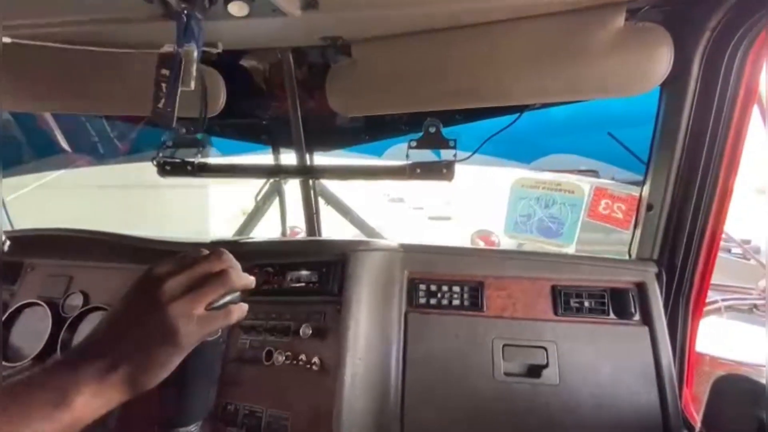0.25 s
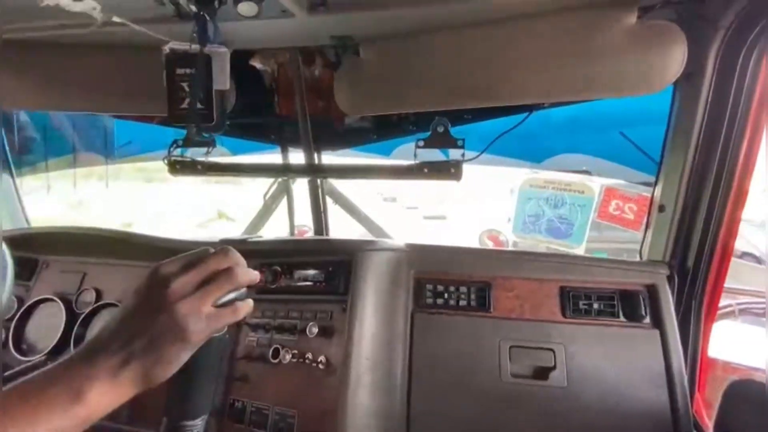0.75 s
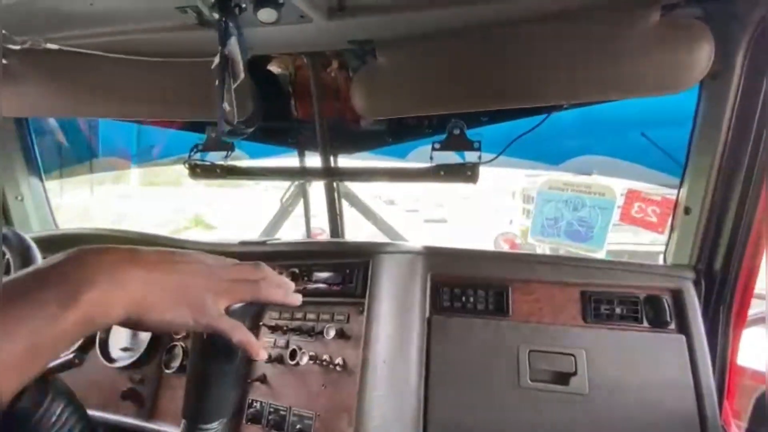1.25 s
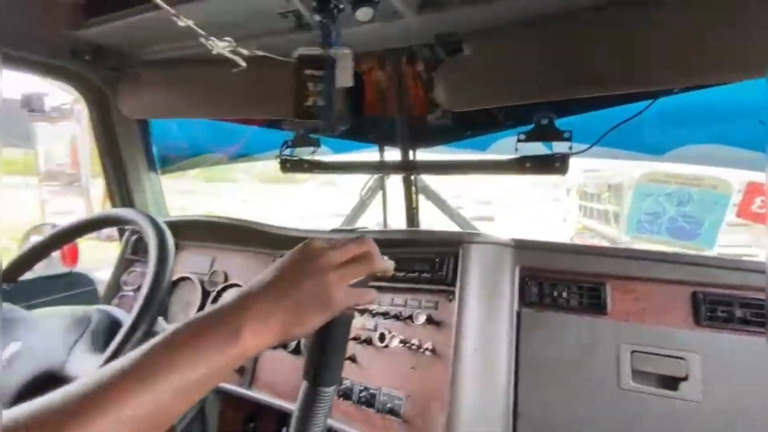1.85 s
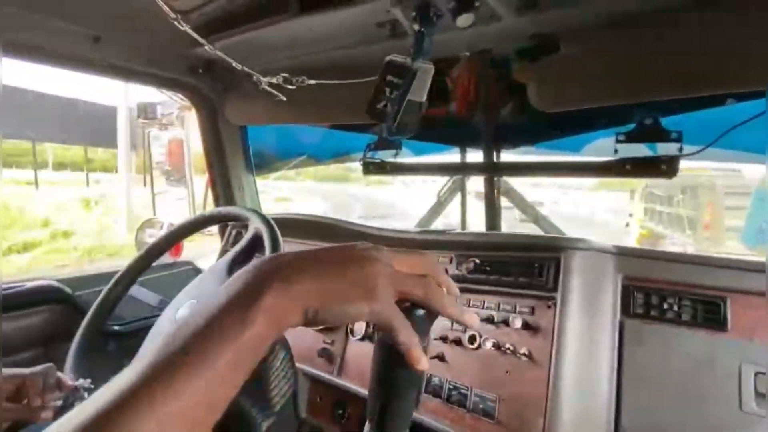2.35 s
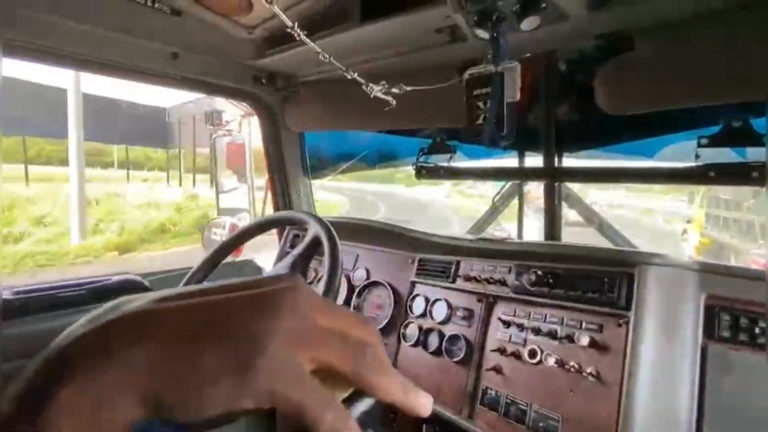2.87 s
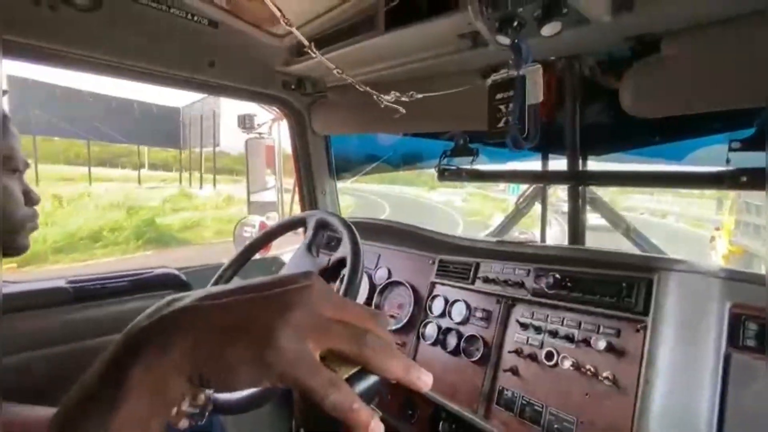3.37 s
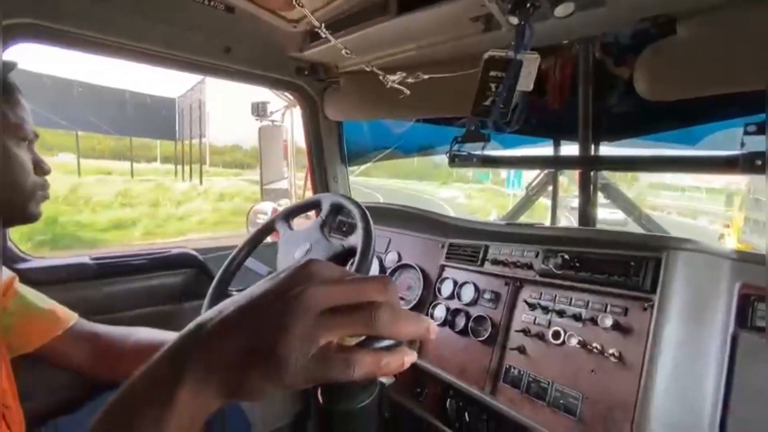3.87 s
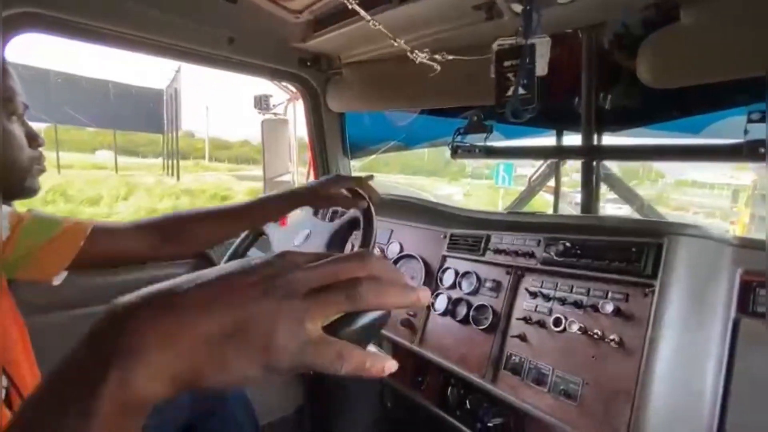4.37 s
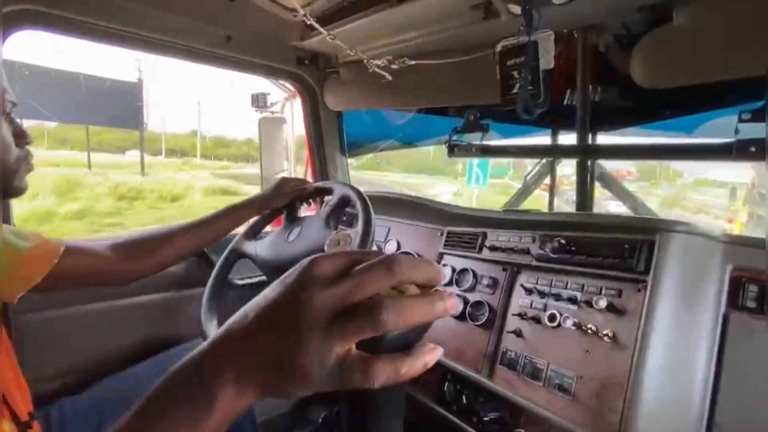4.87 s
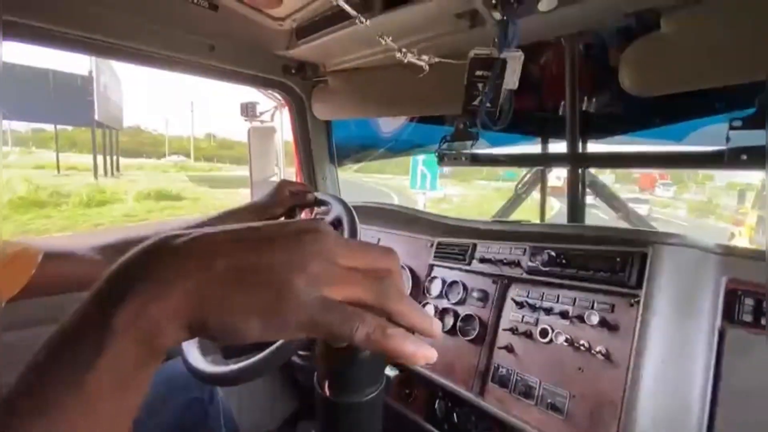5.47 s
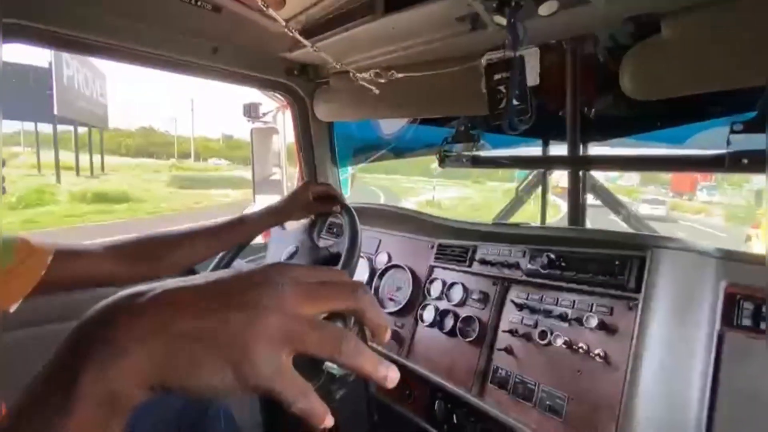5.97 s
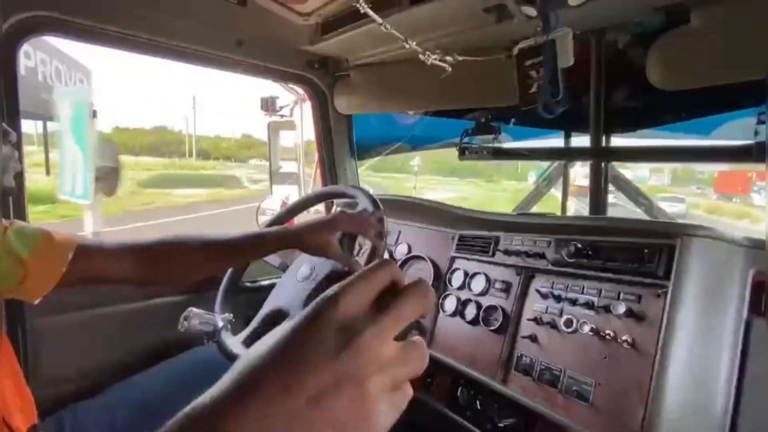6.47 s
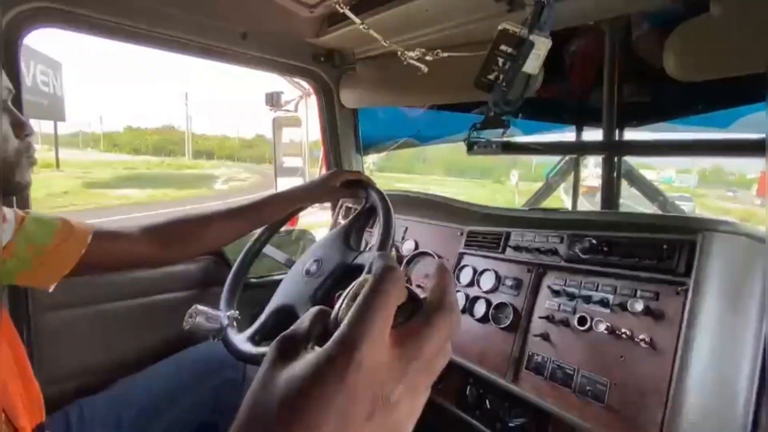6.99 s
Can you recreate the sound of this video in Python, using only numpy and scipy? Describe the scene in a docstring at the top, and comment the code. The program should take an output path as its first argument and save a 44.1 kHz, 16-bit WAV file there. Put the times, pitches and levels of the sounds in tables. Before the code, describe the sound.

A clattering six-cylinder diesel drones up through the gears, turbo whistle falling at each shift while the cab thumps, rattles and rumbles.

```python
"""The exhaust of a six-cylinder diesel truck, heard in the cab as it pulls away with two upshifts.
Harmonics of the firing rate drone and boom, with weak lines between them for the unequal cylinders.
Banded noise makes the buzz, roar, injector clatter and turbo hiss; narrow noise makes the whistles.
Ringing blows make the driveline knocks and loose fittings; gear lines hum while the load is off.
Low rumble swells as the cab shudders, and an air valve at the gear lever puffs."""
import sys
import numpy as np
from scipy import signal
from scipy.fft import rfft, irfft
from scipy.io import wavfile
from scipy.ndimage import uniform_filter1d, minimum_filter1d

SR = 44100
rng = np.random.default_rng(int(sys.argv[2]) if len(sys.argv) > 2 else 0)


def generate_wav(signal):
    """Clip the signal to [-1, 1] and save it as 16-bit WAV at the path in sys.argv[1]."""
    frames = np.transpose(np.atleast_2d(signal))
    scaled = np.clip(frames, -1, 1) * 32767
    pcm = np.round(scaled).astype(np.int16)
    wavfile.write(sys.argv[1], SR, pcm)


N = 318843

# Upper exhaust harmonics: firing_multiple, level_db (against their common level)
UPPER_HARMONICS = [(4, -2), (5, -2.5), (6, -10.5), (7, -12.5)]
# Common level of the upper harmonics: level_db, roar_share, full_load_db, speed_db (per firing/s)
UPPER_LAW = (-38.5, 1.1, 13, 0.33)


def exhaust(firings, firing_hz, boom_db, drive):
    """Harmonics of the firing rate, lifted by the cab; the third throbs once per engine cycle."""
    levels_db = [db + 1.2 * drift(6.9) for db in boom_db]
    strongest = np.argmax(CYLINDERS)
    levels_db[-1] += 2.5 * np.cos(2 * np.pi * (firings - strongest) / 6)
    upper_db = engine_level(UPPER_LAW, drive)
    levels_db += [upper_db + db + 2.5 * drift(4.9) for _, db in UPPER_HARMONICS]
    out = 0
    for k, db in enumerate(levels_db, 1):
        hz = k * firing_hz
        out = out + cab_tone(k * firings, hz, from_db(db + cab_lift_db(hz)))
    return out


# Lines from unequal cylinders: cycle_multiple (of the six-firing cycle), level_db (relative)
UNEVEN_LINES = [(9, 4.5), (10, -6), (14, -18), (15, -15), (17, 10.5), (19, -10), (20, 9), (21, 1.5),
                (22, -8), (23, 6), (26, -2), (28, 9.5), (32, 11.5), (38, 9), (39, 7), (44, -9)]
# Level of the growl: level_db, roar_share, full_load_db, speed_db (per firing/s)
GROWL_LAW = (-35, .5, 13, 0.46)


def growl(cycles, cycle_hz, drive, shake):
    """No two cylinders fire alike, so weak lines fill the gaps between the harmonics."""
    lines = 0
    for k, db in UNEVEN_LINES:
        hz = k * cycle_hz
        lines = lines + cab_tone(k * cycles, hz, from_db(db + cab_lift_db(hz) + 4 * drift(8.6)))
    return shake * from_db(engine_level(GROWL_LAW, drive)) * rms_one(lines)


SAG_ABOVE_HZ, SAG_DB_PER_HZ = 88.8, 1.66   # firings per second; dB per firing/s


def governor_gain(firing_hz):
    """Near top speed the governor cuts the fuel, heard as a fade of the exhaust and growl."""
    return from_db(-SAG_DB_PER_HZ * np.maximum(firing_hz - SAG_ABOVE_HZ, 0))


# Strength of the six cylinders in firing order: level_db (relative)
CYLINDERS = [-1.5, 0, .5, -3.5, -2, -2.5]


def knock_noise(firings, t60_s, repeat, scatter_db):
    """Each cylinder rings through its own path, so a share of the noise repeats every engine cycle."""
    fired = np.flatnonzero(np.diff(firings.astype(int))) + 1
    cylinder = firings[fired].astype(int) % len(CYLINDERS)
    strength = from_db(np.array(CYLINDERS)[cylinder] + scatter_db * rng.standard_normal(len(fired)))
    ringing = 0
    for k in range(len(CYLINDERS)):
        clicks = np.zeros((1, 1, N))
        clicks[..., fired] = strength * (cylinder == k)
        ringing = ringing + signal.oaconvolve(clicks, dying_noise(t60_s), axes=-1)[..., :N]
    return np.sqrt(repeat) * rms_one(ringing) + np.sqrt(1 - repeat) * fresh_noise()


# Colour of the buzz: pitch_hz, density_db (relative, per Hz)
BUZZ = [(150, 0.5), (210, 4), (320, 3), (420, -3), (540, -18), (700, -62)]
# Level of the buzz: level_db, roar_share, full_load_db, speed_db (per firing/s)
BUZZ_LAW = (-30, 0.95, 2.5, 0.32)


def buzz(low_knock, drive, shake):
    """Firings ringing in the block, in the low-middle bands, stronger with load and speed."""
    return shake * from_db(engine_level(BUZZ_LAW, drive)) * cab_noise(low_knock, BUZZ, patchy_db=2.5)


# Colour of the roar: pitch_hz, density_db (relative, per Hz)
ROAR = [(430, -10), (540, -3), (650, -2), (820, -0.5), (950, -6)]
# Level of the roar: level_db, roar_share, full_load_db, speed_db (per firing/s)
ROAR_LAW = (-35, 1.56, -0.5, -0.07)


def roar(low_knock, drive, shake):
    """The same block ringing, heard in the middle bands."""
    return shake * from_db(engine_level(ROAR_LAW, drive)) * cab_noise(low_knock, ROAR, patchy_db=1.8)


# Level of the clatter: level_db, roar_share, full_load_db, speed_db (per firing/s)
CLATTER_LAW = (-36, 1.07, -0.5, -0.03)
HARD_CLATTER_DB, SOFTEN_AT_S, SOFTEN_S = 6.5, 1.0, 0.86   # boost; middle and length of its fade


def injector_level(drive):
    """Injectors clatter harder at first, then soften: level in dB and hardness from 1 to 0."""
    hard = 1 - ramp(SOFTEN_AT_S, SOFTEN_S)
    return engine_level(CLATTER_LAW, drive) + HARD_CLATTER_DB * hard, hard


# Colour of the clatter: pitch_hz, density_db (relative, per Hz)
CLATTER = [(900, -12), (1100, 9.5), (1400, 3), (1700, 0), (2100, 9.5), (2600, -9), (3100, -1), (4200, -3),
           (5000, -14.5), (6500, -1), (9000, -49)]


def clatter(high_knock, clatter_db):
    """Injector knocks ringing in the engine covers, pulsed by the firings."""
    return from_db(clatter_db) * cab_noise(high_knock, CLATTER, patchy_db=1.3)


# Engine covers set ringing by the clatter: pitch_hz, width_hz, level_db (against the clatter)
COVER_MODES = [(384.5, 36, -3), (835, 51, -5.5), (2115, 280, -14)]
COVERS_HARD_DB = 10   # the hard clatter rings the covers more


def covers(clatter_db, hard):
    """Narrow noise at each cover resonance, following the level of the clatter."""
    out = 0
    for hz, width_hz, db in COVER_MODES:
        ring = narrow_noise(np.full(N, hz), width_hz)
        out = out + from_db(clatter_db + COVERS_HARD_DB * hard + db) * ring
    return out


# Range of the fittings' pitches: low_hz, high_hz
CHATTER_HZ = (620, 4800)
CHATTER_DB, CHATTERS_PER_S, CHATTER_T60_S = -3.5, 280, .08   # against the clatter; touches; ring


def fittings(firings, clatter_db, count=48):
    """Firings jolt loose fittings; each touch rings one small part at its own pitch and place."""
    fired = np.flatnonzero(np.diff(firings.astype(int)))
    chance = CHATTERS_PER_S * N / SR / len(fired) / count
    out = np.zeros((2, N))
    for hz in np.geomspace(*CHATTER_HZ, count) * rng.uniform(.985, 1.015, count):
        touched = fired[rng.random(len(fired)) < chance]
        clicks = np.full(N, 1e-18)
        clicks[touched] = from_db(rng.uniform(-5, 5, len(touched))) * (CHATTER_HZ[0] / hz) ** .45
        ring = mode(clicks, hz, CHATTER_T60_S)
        late = np.roll(ring, rng.integers(0, 2 * RIGHT_LAG_S * SR))
        out += [from_db(at_hz(LEFT_DB, hz)) * ring, late]
    return from_db(clatter_db + CHATTER_DB) * rms_one(out)


# Gear lines: cycle_multiple (of the six-firing cycle), level_db (off load)
GEAR_LINES = [(11, -48), (16, -26.5), (22, -32), (28, -39)]
HUM_LOAD_DB = -12   # the hum is weaker with the teeth under full load


def gear_hum(cycles, cycle_hz, load):
    """The geared drives hum in a few unsteady lines that stand out while the engine is off load."""
    out = 0
    for k, db in GEAR_LINES:
        level_db = db + HUM_LOAD_DB * load + 3.2 * drift(6.8)
        out = out + cab_tone(k * cycles, k * cycle_hz, from_db(level_db))
    return out


# Turbo speed: time_s, whistle_hz
TURBO = [(0, 5200), (.55, 5950), (1.3, 6850), (1.7, 7950), (2, 9100), (2.18, 9300), (2.35, 8400),
         (2.58, 7550), (2.9, 6780), (3.45, 5650), (3.9, 6250), (4.3, 7500), (4.95, 8150), (5.15, 6700),
         (5.6, 5550), (6, 5300), (6.3, 6350), (6.6, 7000), (7.23, 7750)]
# Swells of the whistle as it winds down at the shifts: time_s, level_db, spread_s
SURGES = [(2.45, -45, .1), (2.8, -50, .17), (5.19, -53, .07)]
# Colour of the intake hiss: pitch_hz, density_db (relative, per Hz)
HISS = [(4500, 8.5), (5700, 4.5), (6600, 14), (7600, 10), (8400, 11.5), (10000, -2.5), (11800, -4)]
# Level of the hiss: level_db, roar_share, full_load_db, speed_db (per firing/s)
HISS_LAW = (-44.5, 1.3, 0, -0.0939)
HISS_DB_PER_KHZ = 1   # a faster turbo draws more air
TOP_HISS_HZ, TOP_HISS_DB_PER_KHZ = 7350, 0.5   # and hisses brighter above this pitch
TURBO_OVER_HISS_DB, TURBO_SWING = -6, 0.47   # whistle against hiss; extra share of the hiss's swing
SPIN_DOWN_DB, SPIN_DOWN_HZ_PER_S = 5, 1500   # lift while falling from top speed; fall for full lift
WHISTLE_WIDTH_HZ = 240


def turbo(drive):
    """Intake hiss grows and brightens with turbo speed; the whistle stands out as it spins down."""
    air_db = engine_level(HISS_LAW, drive)
    hz, = in_time(TURBO)
    faster_khz = (hz - hz.mean()) / 1000
    hiss_db = air_db + HISS_DB_PER_KHZ * faster_khz
    air = cab_noise(fresh_noise(), HISS, patchy_db=1.35)
    low, top = [signal.sosfilt(signal.butter(3, TOP_HISS_HZ, kind, fs=SR, output="sos"), air)
                for kind in ("low", "high")]
    hiss = from_db(hiss_db) * (low + from_db(TOP_HISS_DB_PER_KHZ * faster_khz) * top)
    falling = uniform_filter1d(np.clip(-np.gradient(hz) * SR / SPIN_DOWN_HZ_PER_S, 0, 1), size=5000)
    stand_out_db = SPIN_DOWN_DB * falling * (hz / hz.max()) ** 2
    whistle_db = hiss_db + TURBO_OVER_HISS_DB + stand_out_db + TURBO_SWING * (air_db - air_db.mean())
    fluttering_hz = hz * (1 + .008 * drift(25))
    whistle = from_db(1.5 * drift(15)) * narrow_noise(fluttering_hz, WHISTLE_WIDTH_HZ)
    return hiss + (from_db(whistle_db) + swells(SURGES)) * whistle


# Driveline and lever knocks: start_s, blow_db, hardness_hz
KNOCKS = [(2.135, -20, 300), (2.232, -22.5, 200), (2.875, -29, 304), (2.9, -19, 100), (2.928, -15, 110),
          (2.968, -16, 80), (3.032, -24.5, 400), (3.053, -27, 700), (3.072, -22, 1200), (3.102, -26.5, 900),
          (3.129, -26, 250), (3.162, -26, 250), (3.19, -35, 496), (3.29, -26, 300), (4.425, -21, 200),
          (5.191, -27, 402), (5.222, -20, 150), (5.252, -15.5, 100), (5.292, -25.5, 700),
          (5.392, -17.5, 160)]
# Ringing of the cab floor and gear lever: pitch_hz, level_db, t60_s
FLOOR_MODES = [(87, -5.5, 0.18), (117, -3.5, 0.2), (210, -7.5, 0.24), (306, 8.5, 0.045), (450, -20, 0.037),
               (747, -7.5, 0.1), (900, -9, 0.09), (1030, -7, 0.14), (1310, -9, 0.054)]
# Colour of the rattling trim: pitch_hz, gain_db
RATTLE = [(60, -15), (150, 6), (300, 5.5), (500, -11), (750, -5), (1300, -13), (1900, -18), (4000, -36)]
RATTLE_DB, RATTLE_T60_S = 46, .065   # gain of the trim's rattle over the blows; its decay


def knocks():
    """Driveline slack takes up, thumps the floor and rattles trim; soft blows ring the low modes."""
    blows, rattle = np.zeros(N), np.zeros((2, N))
    for s, db, hard_hz in KNOCKS:
        soften, start = signal.butter(1, hard_hz, fs=SR), round(s * SR)
        blows += signal.lfilter(*soften, signal.unit_impulse(N, start) * from_db(db) + 1e-18)
        burst = signal.lfilter(*soften, dying_noise(RATTLE_T60_S)[0]) * from_db(db)
        rattle[:, start:start + burst.shape[1]] += burst
    bins_hz = np.maximum(np.arange(N // 2 + 1) * SR / N, 1)
    out = from_db(RATTLE_DB) * irfft(rfft(rattle) * from_db(at_hz(RATTLE, bins_hz)), N)
    for hz, db, t60_s in FLOOR_MODES:
        out += from_db([[db + 6.0], [db]]) * mode(blows, hz, t60_s)   # louder on the left
    return out


# Puffs of the air valve: time_s, level_db, spread_s
PUFFS = [(1.975, -41, .025), (4.61, -47, .015), (6.915, -32, .011), (6.975, -27, .016)]
# Colour of the puffs: pitch_hz, density_db (relative, per Hz)
PUFF = [(2500, -9), (4000, 3), (4900, 8), (7000, 0), (9000, -1), (10500, -1), (12000, -5)]


def air_valve():
    """Short bright puffs of compressed air."""
    return swells(PUFFS) * cab_noise(fresh_noise(), PUFF, patchy_db=3)


# Swells of the squeak: time_s, level_db, spread_s
SQUEAKS = [(.25, -36, 0.037), (1.6, -42, .08), (3.54, -33, 0.026), (3.78, -36.5, 0.09), (4.3, -41, .2)]
SQUEAK_HZ = 3495


def squeak():
    """A thin flickering whistle at one pitch, coming and going."""
    return swells(SQUEAKS) * narrow_noise(np.full(N, SQUEAK_HZ), width_hz=15)


# Colour of the rumble: pitch_hz, density_db (relative, per Hz)
RUMBLE = [(25, -18), (40, -8), (58, -6.5), (90, -4), (130, -4), (180, -5.5), (240, -16)]
# Shudders as the driveline loads and unloads and over bumps: time_s, level_db, spread_s
SHUDDERS = [(.1, -34.5, 0.15), (1.1, -37, 0.1), (2.1, -23, 0.073), (2.24, -24, 0.054), (2.97, -28, 0.093),
            (3.15, -24.5, 0.066), (4.5, -41, 0.1), (4.95, -34, 0.23), (5.24, -23, 0.037),
            (5.44, -31, 0.089), (6.35, -27, 0.095)]
ROAD_DB, ROAD_FOLLOWS = -27, 0.7   # underlying rumble; its share of the roar's swing


def rumble(swing_db):
    """Low noise of the road and engine, swelling as the cab shudders."""
    gain = from_db(ROAD_DB + ROAD_FOLLOWS * swing_db) + swells(SHUDDERS)
    return gain * cab_noise(fresh_noise(), RUMBLE, patchy_db=1.5)


# Engine speed: time_s, firing_hz
SPEED = [(0, 64.5), (.2, 66.6), (.7, 74.6), (1.35, 82.5), (1.6, 86.7), (2.2, 94.2), (2.4, 86.7),
         (2.8, 76.6), (3, 78.8), (3.9, 80.8), (4.3, 82.6), (4.8, 86.2), (5.03, 85.8), (5.4, 74.9),
         (5.6, 73.1), (5.85, 76.2), (6.1, 76.5), (6.9, 82.2), (7.23, 83.6)]


def engine_speed():
    """Firings per second, and the running count of firings with a slight speed wander."""
    firing_hz, = in_time(SPEED)
    return firing_hz, np.cumsum(firing_hz * (1 + .0015 * drift(8))) / SR


# Moves of the pedal: middle_s, travel_s, load (0-1), boom1_db, boom2_db, boom3_db (exhaust harmonics)
PEDAL = [(-.3, .3, 1, -12, -14, -26), (2.22, 0.1, 0.04, -31, -39, -46), (2.87, 0.085, 0, -14, -45, -34.5),
         (3.04, .15, 0.05, -19, -45, -39.5), (3.6, 0.37, 0.7, -22.5, -46, -23),
         (3.85, 0.18, 0.58, -18.5, -32, -19.5), (4.34, .15, 0.26, -18, -30.5, -39),
         (4.78, 0.44, 0.63, -13.5, -28, -29.5), (5.08, 0.12, 0.26, -30.5, -53, -47),
         (5.37, 0.26, 1, -12.5, -30, -20.5), (6.22, 0.36, 1, -11.5, -18.5, -18),
         (6.78, 0.22, 0.8, -11, -25, -19.5)]


def pedal():
    """Each move takes the load and the three low harmonics smoothly to new values and holds them."""
    steps = np.diff([row[2:] for row in PEDAL], axis=0, prepend=0)
    moves = [np.outer(step, ramp(s, travel_s)) for (s, travel_s, *_), step in zip(PEDAL, steps)]
    load, *boom_db = sum(moves)
    return np.clip(load, 0, 1), boom_db


# Rise and fall of the roar, used as a swing about its mean: time_s, level_db
ROAR_LEVEL = [(0.0, -30.5), (0.4, -35.5), (0.68, -33.5), (1.29, -34.5), (1.69, -33), (2.33, -39.5),
              (2.94, -39.5), (3.1, -40), (3.81, -36.5), (4.25, -37), (4.83, -36), (5.25, -37.5), (5.7, -39),
              (5.94, -39.5), (6.18, -34.5), (6.4, -34), (6.68, -33), (7.23, -36.5)]


def roar_swing():
    """The roar's level in dB about its mean, which the other engine noises follow."""
    level_db, = in_time(ROAR_LEVEL)
    return level_db - level_db.mean()


def engine_level(law, drive):
    """Level in dB from the roar's swing, the load and the speed; base at mean swing and speed, no load."""
    level_db, roar_share, full_load_db, speed_db = law
    swing_db, load, faster_hz = drive
    return level_db + roar_share * swing_db + full_load_db * load + speed_db * faster_hz


SHAKE_HZ, SHAKE_WIDTH_HZ, SHAKE_DB = 87.4, 0.98, 3   # firings per second; spread; lift at full load


def cab_shake(firing_hz, load):
    """Under load the engine shakes the cab hardest around one firing rate."""
    return from_db(SHAKE_DB * load * np.exp(-.5 * ((firing_hz - SHAKE_HZ) / SHAKE_WIDTH_HZ) ** 2))


# Cab air resonances and dead spots met by the rising lines: pitch_hz, width_hz, lift_db
CAB_MODES = [(83.2, 1.3, -1.5), (131.1, 8.3, 9), (160.4, 4.1, 7.5), (170.1, 10, 8.5), (209, 14.6, -5.5),
             (234.9, 2.4, 5), (239, 20.3, 6), (266.7, 20, 4), (298.1, 5.4, 10), (336.6, 36, 5.5),
             (352.4, 3.2, 11.5), (415.4, 4.9, 9), (528, 38, 8.5)]


def cab_lift_db(hz):
    """A line swells or fades while it passes through a resonance or dead spot of the cab."""
    return sum(db / (1 + (2 * (hz - centre) / width) ** 2) for centre, width, db in CAB_MODES)


# Left channel against right: pitch_hz, level_db
LEFT_DB = [(40, -3), (80, -10), (160, -8.5), (245, -6), (380, -7.5), (600, -3), (2000, -2.5), (4000, -2.5),
           (6300, -0.5), (9000, -15), (11500, 1)]
# Left channel against right, from the cab's standing waves: pitch_hz, phase_rad
LEFT_PHASE = [(80, 1), (165, -3.5), (215, -1.3), (250, -1), (300, 1.5), (340, 1.5), (400, 2.5), (445, 1.5),
              (480, 2.5), (515, 1.4), (560, 3), (640, 0.5)]
# Uneven combustion shakes the phase: low tones stay clean, those from this pitch up turn rough
ROUGH_TURNS, ROUGH_HZ = .07, 500


def cab_tone(turns, hz, gain):
    """A tone of rms `gain` on the right; standing waves shift its level and phase on the left."""
    wander = ROUGH_TURNS * np.minimum(hz / ROUGH_HZ, 1) ** 2 * drift(22)
    angle = 2 * np.pi * (turns + rng.random() + wander)
    coarse_hz = np.broadcast_to(hz, N)[::64]
    coarse = [from_db(at_hz(LEFT_DB, coarse_hz)), at_hz(LEFT_PHASE, coarse_hz)]
    left_gain, left_phase = np.repeat(coarse, 64, axis=1)[:, :N]
    return np.sqrt(2) * gain * np.array([left_gain * np.sin(angle + left_phase), np.sin(angle)])


# Likeness of the two channels: pitch_hz, correlation (-1 to 1)
LIKENESS = [(50, -0.23), (110, 0.11), (170, -0.78), (300, 0.59), (500, -0.72), (800, 0.71), (1300, 0.24),
            (2200, -0.00046), (3200, 0.35), (4400, 0.99), (5500, 0.6), (6600, 0.72), (8000, 0.4),
            (11000, 1)]
RIGHT_LAG_S = 20 / 44100


def cab_noise(white, spectrum, patchy_db):
    """Third-octave bands of flickering noise that reach the left first; rms 1 in the middle."""
    low, high = spectrum[0][0], min(spectrum[-1][0], SR / 3)
    edges = 20 * 2 ** (np.arange(30) / 3)
    out = np.zeros((2, N))
    for k, band in enumerate(zip(edges, edges[1:])):
        if band[1] < low or band[0] > high:
            continue
        mid, side = signal.sosfilt(signal.butter(2, band, "band", fs=SR, output="sos"), white[k % 2])
        hz = np.sqrt(band[0] * band[1])
        alike = np.clip(at_hz(LIKENESS, hz), -1, 1)
        pair = np.sqrt(1 + alike) * mid + np.sqrt(1 - alike) * side * [[1], [-1]]
        flicker = from_db(at_hz(spectrum, hz) + patchy_db * drift(10.7))
        out += flicker * from_db([[at_hz(LEFT_DB, hz)], [0]]) * pair
    out[1] = np.roll(out[1], round(RIGHT_LAG_S * SR))
    return out / np.std(out.mean(axis=0))


def narrow_noise(hz, width_hz):
    """A breathy tone around a moving pitch, a little later on the right."""
    carrier = np.exp(2j * np.pi * np.cumsum(hz) / SR)
    wave = ((drift(width_hz) + 1j * drift(width_hz)) * carrier).real
    late = np.roll(wave, round(RIGHT_LAG_S * SR))
    return np.array([from_db(at_hz(LEFT_DB, np.mean(hz))) * wave, late])


# Narrow peaks and dips that colour the noise: pitch_hz, width_hz, gain_db
NOISE_COLOUR = [(349, 27, 2), (521, 27, 6), (725, 18, 2), (698, 100, 2.5), (1373, 30, 4.5),
                (1550, 100, 5.5), (1780, 58, 1), (2250, 21, -1), (3100, 67, 2.5), (3570, 320, 3.5),
                (3880, 230, -1.5), (4580, 76, 1), (5520, 326, -9.5), (5750, 160, 8.5), (6050, 320, -8.5),
                (6420, 180, 5), (6800, 430, 3), (7650, 250, -7), (8240, 370, 4.5), (10044, 31, 7)]


def coloured(noise):
    """A chain of peaks and dips, one for each row of the colour table."""
    sections = []
    for hz, width, db in NOISE_COLOUR:
        gain, half = from_db(db / 2), np.pi * width / SR
        turn = -2 * np.cos(2 * np.pi * hz / SR)
        top = [1 + half * gain, turn, 1 - half * gain]
        bottom = [1 + half / gain, turn, 1 - half / gain]
        sections.append(np.array(top + bottom) / bottom[0])
    return signal.sosfilt(sections, noise)


def mode(blows, hz, t60_s):
    """One damped resonance rung by blows."""
    r, w = from_db(-60 / (t60_s * SR)), 2 * np.pi * hz / SR
    return signal.lfilter([0, np.sin(w)], [1, -2 * r * np.cos(w), r * r], blows)


def dying_noise(t60_s, size=9000):
    """Dense ring of many panel modes after a blow: odd and even bands, middle and side; energy 1."""
    ring = rng.standard_normal((2, 2, size)) * from_db(-60 * np.arange(size) / (t60_s * SR))
    return rms_one(ring) / np.sqrt(size)


def fresh_noise():
    """White noise for odd and even bands, middle and side."""
    return rng.standard_normal((2, 2, N))


def drift(rate_hz):
    """Slow chance of spread 1: coarse noise through a double one-pole low-pass."""
    r = np.exp(-80 * np.pi * rate_hz / SR)   # one coarse step is 40 samples
    slow = signal.lfilter([1], [1, -2 * r, r * r], rng.standard_normal(N // 40 + 2002))[2000:]
    return np.interp(np.arange(N) / 40, np.arange(len(slow)), rms_one(slow))


def ramp(at_s, length_s):
    """A smooth step from 0 to 1, centred on a moment."""
    return .5 + .5 * np.sin(np.pi * np.clip((np.arange(N) / SR - at_s) / length_s, -.5, .5))


def swells(rows):
    """Gain of bell-shaped swells."""
    t = np.arange(N) / SR
    return sum(from_db(db) * np.exp(-.5 * ((t - s) / spread_s) ** 2) for s, db, spread_s in rows)


def in_time(rows):
    """The columns of a curve, one value per sample."""
    s, *columns = np.transpose(rows)
    return [np.interp(np.arange(N) / SR, s, c) for c in columns]


def at_hz(points, hz):
    """Read a spectrum on a log-frequency axis."""
    return np.interp(np.log(hz), np.log(np.array(points)[:, 0]), np.array(points)[:, 1])


def from_db(db):
    """Decibels to gain."""
    return np.exp(np.asarray(db) * (np.log(10) / 20))


def rms_one(x):
    """Scale to rms 1."""
    return x / np.sqrt(np.mean(x ** 2) + 1e-20)


def scene():
    """Engine speed drives the engine tones and noise pulses; load, speed and roar set levels."""
    firing_hz, firings = engine_speed()
    cycles, cycle_hz = firings / 6, firing_hz / 6
    load, boom_db = pedal()
    swing_db = roar_swing()
    drive = swing_db, load, firing_hz - firing_hz.mean()
    shake = cab_shake(firing_hz, load)

    tones = exhaust(firings, firing_hz, boom_db, drive) + growl(cycles, cycle_hz, drive, shake)
    tones *= governor_gain(firing_hz)
    tones += gear_hum(cycles, cycle_hz, load)

    low_knock = knock_noise(firings, t60_s=.2, repeat=.8, scatter_db=1)   # rings in the block
    high_knock = knock_noise(firings, t60_s=.1, repeat=.4, scatter_db=.6)   # rings in the covers
    clatter_db, hard = injector_level(drive)
    lean_db = 6 - 4.6 * load   # left lift over right: load moves the shaking to the right
    shaking = from_db(lean_db * [[.5], [-.5]]) * (rumble(swing_db) + buzz(low_knock, drive, shake))
    noises = shaking + roar(low_knock, drive, shake) + clatter(high_knock, clatter_db)
    noises += fittings(firings, clatter_db) + turbo(drive)
    return tones + coloured(noises) + covers(clatter_db, hard) + knocks() + squeak() + air_valve()


LIMIT_DB, CUTOFF_HZ = -0.8, 11700   # limiter ceiling before the top is cut; top cut


def record(dry):
    """The deepest rumble is cut, a fast limiter holds the peaks, the top is cut."""
    dry = signal.sosfilt(signal.butter(2, 22, "high", fs=SR, output="sos"), dry)
    room_left = np.minimum(1, from_db(LIMIT_DB) / (np.abs(dry).max(axis=0) + 1e-9))
    gain = uniform_filter1d(minimum_filter1d(room_left, size=400), size=400)
    return signal.sosfilt(signal.ellip(12, .1, 80, CUTOFF_HZ, fs=SR, output="sos"), dry * gain)


dry = scene()
out = record(dry)
generate_wav(out)
```